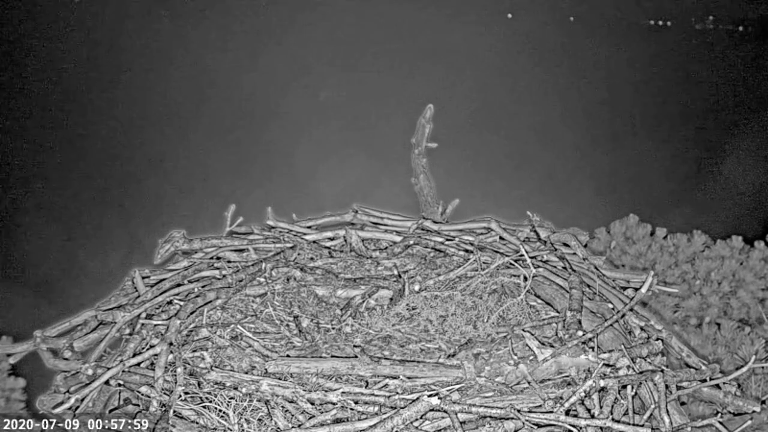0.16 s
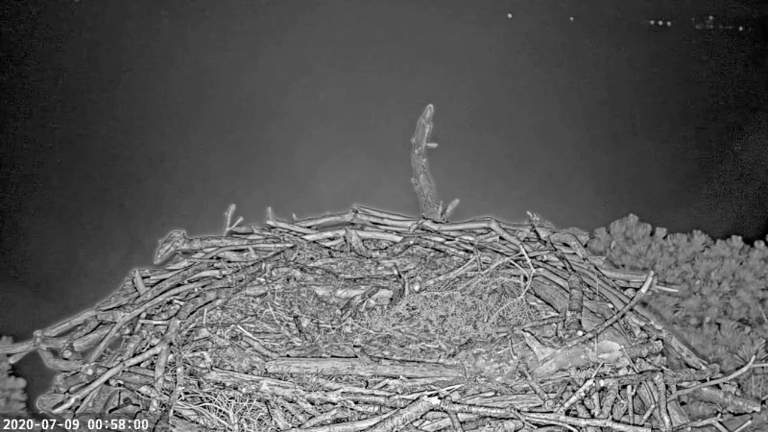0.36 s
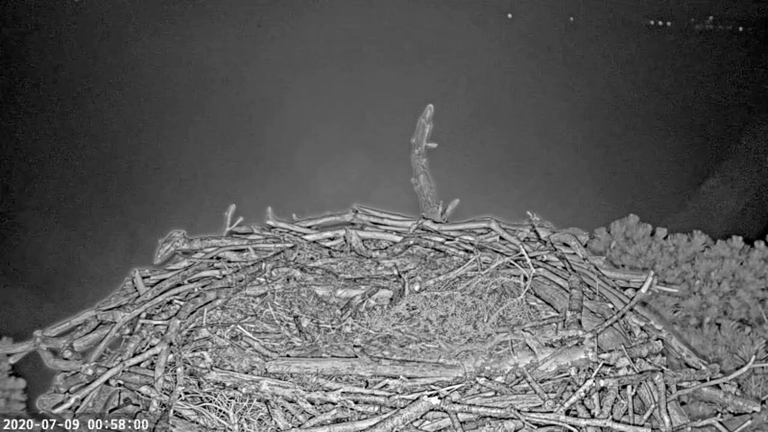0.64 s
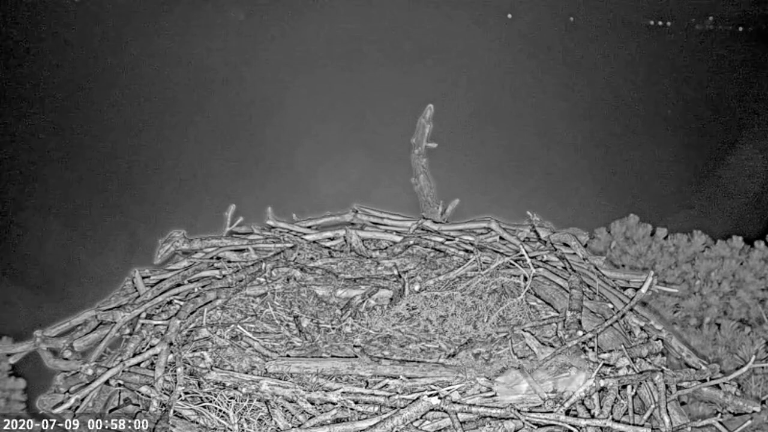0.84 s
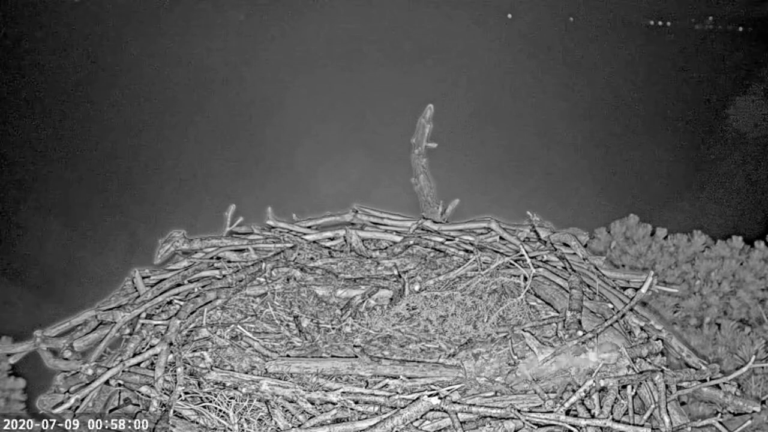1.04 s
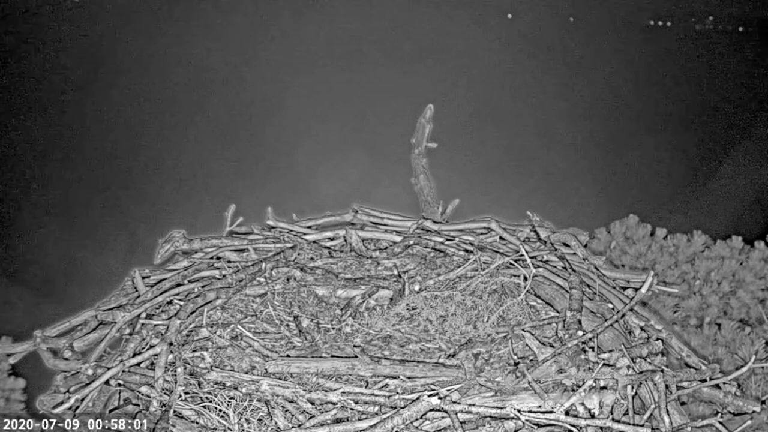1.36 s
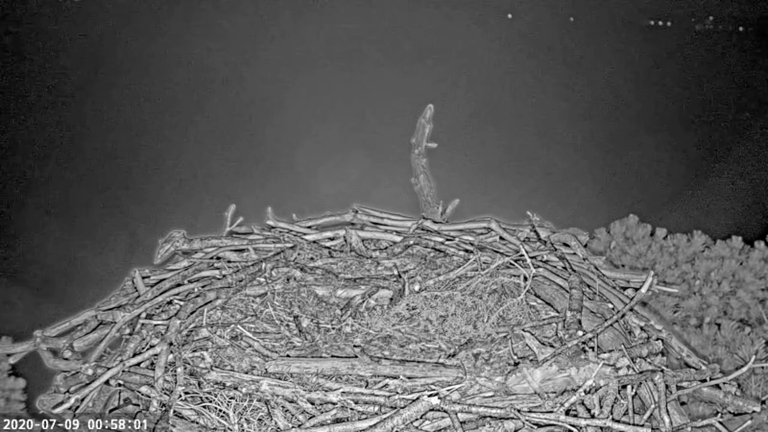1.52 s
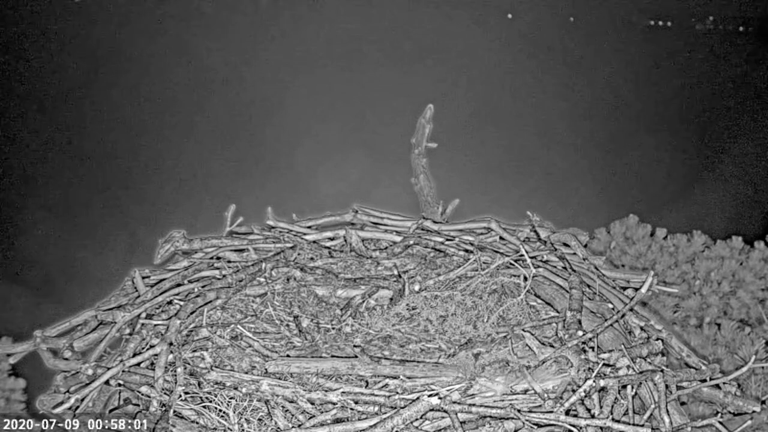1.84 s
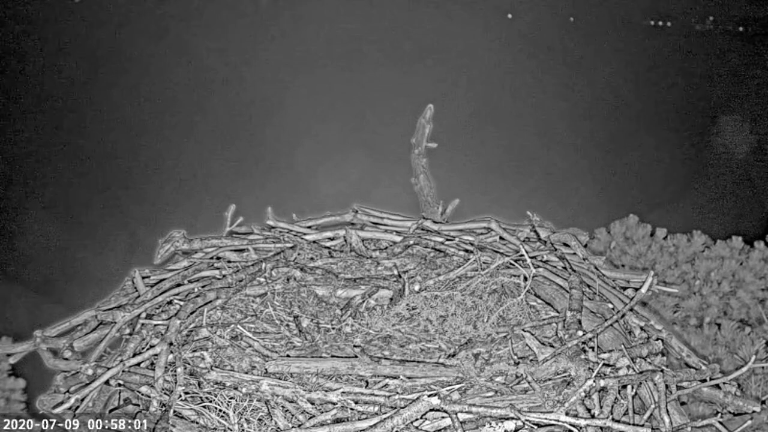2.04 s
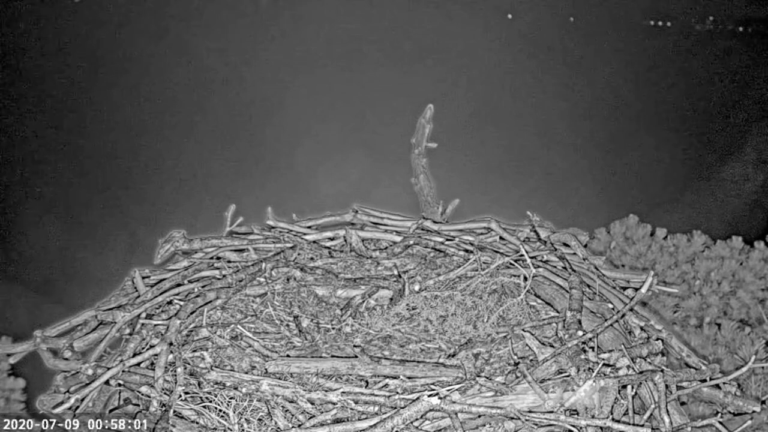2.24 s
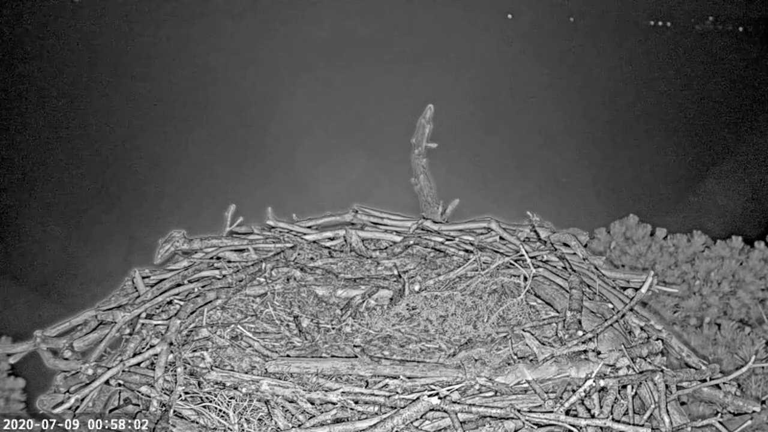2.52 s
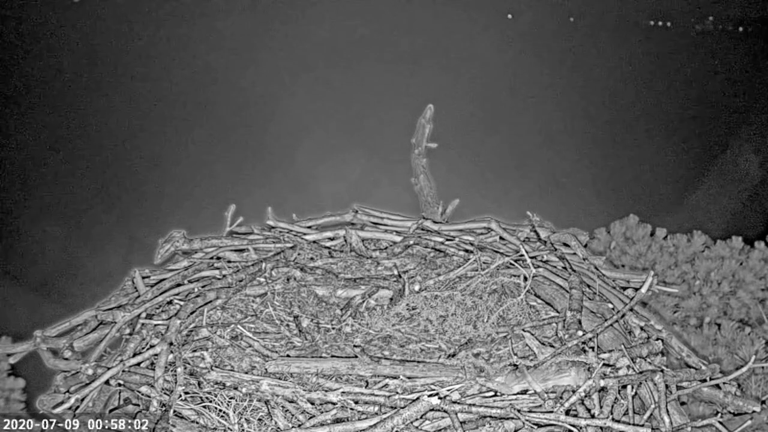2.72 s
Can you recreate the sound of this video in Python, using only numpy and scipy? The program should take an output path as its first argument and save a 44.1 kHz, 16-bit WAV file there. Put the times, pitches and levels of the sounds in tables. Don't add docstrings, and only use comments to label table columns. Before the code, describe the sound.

A nightjar some way off finishes a fast low phrase in the first 0.1 seconds, then pauses. From about 0.4 seconds its churr swells in quickly, nearly full by 0.8, and continues to the end near 3 seconds: about 27 short falling whistles per second, with dull short echoes. Low wind rumbles on the microphone, stronger early, with a thump near 1.6, over thin steady hiss.

```python
import sys
import numpy as np
from scipy import signal
from scipy.fft import rfft, irfft
from scipy.io import wavfile
from scipy.ndimage import uniform_filter1d

SR = 44100
rng = np.random.default_rng(int(sys.argv[2]) if len(sys.argv) > 2 else 0)


def transcribe(u):
    v = np.clip(np.atleast_2d(u).T, -1, 1)
    q = np.round(v * 32767).astype(np.int16)
    wavfile.write(sys.argv[1], SR, q)


def field_ratio(decibels):
    return 10 ** (np.asarray(decibels, dtype=float) / 20)


N = 127008


def rms_one(x):
    return x / np.sqrt(np.mean(x ** 2) + 1e-20)


def at_hz(points, hz):
    point_hz, point_db = np.transpose(points)
    return np.interp(np.log(hz), np.log(point_hz), point_db)


def drift(rate):
    r = np.exp(-80 * np.pi * rate / SR)
    slow = signal.lfilter([1], [1, -2 * r, r * r], rng.standard_normal(N // 40 + 2002))
    slow = rms_one(slow[2000:])
    return np.interp(np.arange(N) / 40, np.arange(len(slow)), slow)


def resonance(x, hz, width):
    r = np.exp(-np.pi * width / SR)
    poles = [1, -2 * r * np.cos(2 * np.pi * hz / SR), r * r]
    return signal.lfilter(np.array([1, 0, -1]) * (1 - r * r) / 2, poles, x)


def hiss():
    # pitch_hz, level_db [dB per Hz]
    hiss_colour = [(300, 10.5), (600, 5.5), (1500, 5), (3500, 0.13), (7000, -2.5), (10500, -3.5),
                   (12400, -7.5), (14000, -22)]
    hz = np.arange(N // 2 + 1) * SR / N + 1
    spectrum = rfft(rng.standard_normal(N)) * field_ratio(at_hz(hiss_colour, hz))
    return field_ratio(-67.5) * rms_one(irfft(spectrum, N))


def wind():
    # time_s, level_db
    wind_level = [(0, -33.5), (.1, -37.5), (.3, -34.5), (0.378, -37), (.6, -36), (.73, -35.5), (.83, -30),
                  (1.0, -38), (1.12, -40.5), (1.382, -37), (1.48, -58), (1.662, -41.5), (1.76, -54.5),
                  (2.28, -56), (2.42, -47.5), (2.62, -44), (2.69, -54.5), (2.88, -48)]
    # pitch_hz, level_db [dB per Hz]
    wind_colour = [(10, 0.5), (18, 5.9), (43, -1), (119, -10.5), (250, -16), (600, -17)]
    # start_s (their middle), length_s, gain_db
    buffet_list = [
        (.275, .015, 4),
        (.62, .015, 5),
        (.95, .015, 4),
        (1.565, .018, 11),
        (1.97, .015, 6),
        (2.13, .02, 5),
        (2.455, .015, 8),
        (2.775, .02, 7),
    ]
    bass_follows, top_follows = 0.21, 1.205
    bass_buffet, top_buffet = 0.7, 1.5
    t = np.arange(N) / SR
    time_s, level_db = np.transpose(wind_level)
    wind_db = np.interp(t, time_s, level_db)
    swing = wind_db - np.mean(level_db)
    buffets = sum(gain * np.exp(-((t - at) / length) ** 2) for at, length, gain in buffet_list)

    together = drift(14)
    white = rng.standard_normal((2, N + SR))
    edges = 11 * 2 ** np.arange(0, 5.6, .5)
    out = 0
    for k, (low, high) in enumerate(zip(edges, edges[1:])):
        sos = signal.butter(2, [low, high], "band", fs=SR, output="sos")
        band = signal.sosfilt(sos, white[k % 2])[SR:]
        height = k / 10
        band_db = at_hz(wind_colour, np.sqrt(low * high))
        band_db = band_db + (bass_follows + (top_follows - bass_follows) * height) * swing
        band_db = band_db + (bass_buffet + (top_buffet - bass_buffet) * height) * buffets
        band_db = band_db + height ** 2 * (1.84 * together + 0.5 * drift(18))
        out = out + band * field_ratio(band_db)
    out = signal.sosfilt(signal.butter(8, 292.7, fs=SR, output="sos"), out)
    return field_ratio(6.5) * rms_one(out) * np.sqrt(np.mean(field_ratio(2 * wind_db)))


def heath(x):
    # pitch_hz, width_hz, level_db
    throat = [(1148, 67, -3), (1647, 47, -2.6), (1730, 37, -4.5), (2473, 44, -13.5)]
    # pitch_hz, width_hz
    dips = [(1950, 210), (2650, 150)]
    # delay_s, level_db, sign (-1 = turned upside down)
    echo_list = [
        (.0021, -28.5, 1),
        (.0078, -12, 1),
        (.0146, -26.5, -1),
        (0.027, -25, 1),
    ]
    tail_db, tail_t60_s, tail_start_s = -45.5, 0.13, 0.0052
    t = np.arange(SR // 5) / SR
    scatter = field_ratio(tail_db) * 1000. ** (-t / tail_t60_s) * rng.standard_normal(len(t))
    scatter = scatter * (t > tail_start_s)
    echoes = np.zeros(len(t))
    for delay, db, sign in echo_list:
        echoes[int(delay * SR)] = np.sign(sign) * field_ratio(db)

    x = x + sum(field_ratio(db) * resonance(x, hz, width) for hz, width, db in throat)
    for hz, width in dips:
        x = x - resonance(x, hz, width)
    far = resonance(x, 1670, 190) + field_ratio(-8.5) * x
    returned = signal.fftconvolve(far, echoes) + signal.fftconvolve(x, scatter)
    return field_ratio(-2) * (x + returned[:len(x)])


def churr_notes():
    beats = [0.4076, 0.5516, 0.6998, 0.8489, 0.9958, 1.1448, 1.2919, 1.4362, 1.5842, 1.7314, 1.8777, 2.0236,
             2.1738, 2.3203, 2.4718, 2.6221, 2.7695, 2.9203]
    # time_s, level_db, effort (0-1)
    low_phrase = [
        (-0.0022, -26, .15),
        (0.0228, -32, 0.16),
        (0.0474, -31, 0.21),
        (0.0761, -30.5, 0.33),
    ]
    # time_s, level_db, effort (0-1)
    swell = [
        (0.398, -37.5, 0.4),
        (0.548, -34, 0.83),
        (0.799, -30.5, 0.89),
        (2.9, -29.5, 0.97),
    ]
    s = np.interp(np.arange(4 * len(beats) - 4) / 4, np.arange(len(beats)), beats)
    time_s, level_db, effort = np.transpose(swell)
    churr = np.transpose([s, np.interp(s, time_s, level_db), np.interp(s, time_s, effort)])
    return np.vstack([low_phrase, churr])


def note_pitch(t, lead, effort, top_spread):
    peak_hz, end_hz = 1625, 1108.5
    top_hz = (1799.3 + 702 * effort) * top_spread
    fall_s = .0014 + .0010 * effort
    glide = np.clip(-t / (lead * (1 - .22)), 0, 1)
    before = peak_hz + (top_hz - peak_hz) * glide ** 1.2 * (1.6 - .6 * glide)
    after = end_hz + (peak_hz - end_hz) * np.exp(-(np.maximum(t, 0) / fall_s) ** 1.5)
    return np.where(t < 0, before, after)


def note_loudness(t, lead, effort, db):
    attack_s, peak_width_s, release_s = .0009, .0015, .0015
    tail_s = .0015 + .0021 * effort
    attack = np.sin(np.pi / 2 * np.clip((t + lead) / attack_s, 0, 1)) ** 2
    release = np.exp(-(np.maximum(t - tail_s, 0) / release_s) ** 2)
    softer = db - db.max()
    base = np.where(t < 0, field_ratio(-6 + .6 * softer), field_ratio(-2.5 + 1.7 * softer))
    base = uniform_filter1d(base, size=90)
    return attack * release * (base + (1 - base) * np.exp(-(t / peak_width_s) ** 2))


def throat_overtone(over):
    # pitch_hz, width_hz, level_db
    bands = [(3100, 70, 0), (2890, 110, -5), (4860, 200, -9)]
    return sum(field_ratio(-6 + db) * resonance(resonance(over, hz, 3 * width), hz, width)
               for hz, width, db in bands)


def nightjar():
    pitch_spread, level_spread_db, time_spread_s = .01, .55, .0002
    throat_lag_s = .0012
    notes = churr_notes()
    s, db, effort = notes.T[:, :, None]
    chance = rng.standard_normal((len(notes), 4)).T[:, :, None]
    pad = SR // 50
    t = np.arange(-pad, pad) / SR
    lead = .0042 + .0027 * effort

    hz = note_pitch(t, lead, effort, 1 + pitch_spread * chance[0]) * (1 + pitch_spread * chance[1])
    phase = 2 * np.pi * np.cumsum(hz * (t > -lead), axis=1) / SR
    env = note_loudness(t, lead, effort, db) * field_ratio(db + level_spread_db * chance[2])

    peak_s = s - throat_lag_s + time_spread_s * chance[3]
    at = (peak_s * SR).astype(int) + np.arange(2 * pad) + pad
    tone, over = np.zeros((2, N + 6 * pad))
    np.add.at(tone, at, env * np.sin(phase))
    np.add.at(over, at, env * field_ratio(12 * (effort - 2)) * np.sin(2 * phase))
    tone = signal.sosfilt(signal.butter(4, [1118, 2540], "band", fs=SR, output="sos"), tone)
    return tone + throat_overtone(over), 2 * pad


def scene():
    bird, start = nightjar()
    return (heath(bird)[start:start + N] + wind() + hiss())[None]


def roll_off(x):
    return signal.sosfilt(signal.butter(12, 14100, fs=SR, output="sos"), x)


def record(dry):
    return roll_off(dry)


dry = scene()
out = record(dry)
transcribe(out)
```